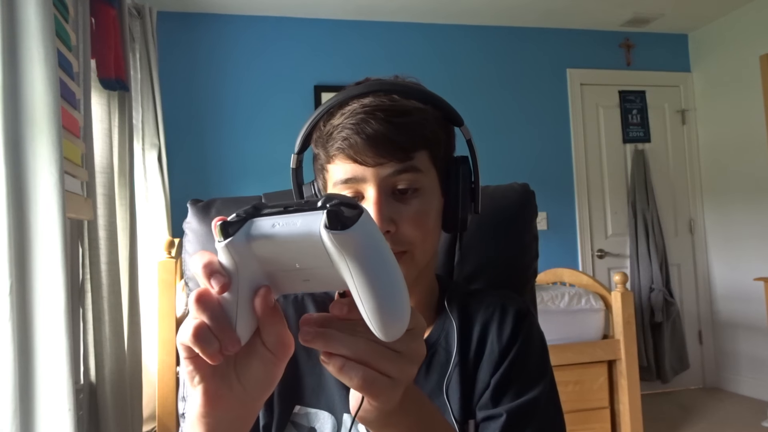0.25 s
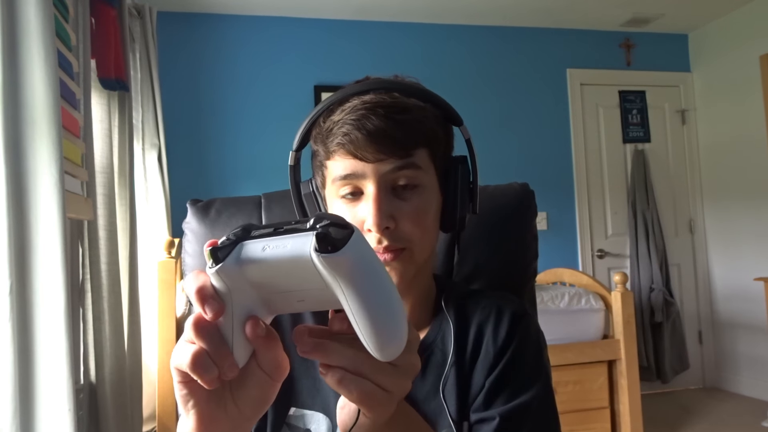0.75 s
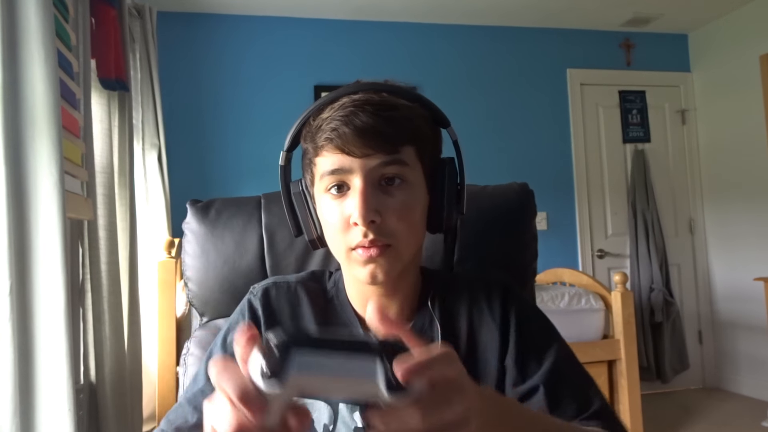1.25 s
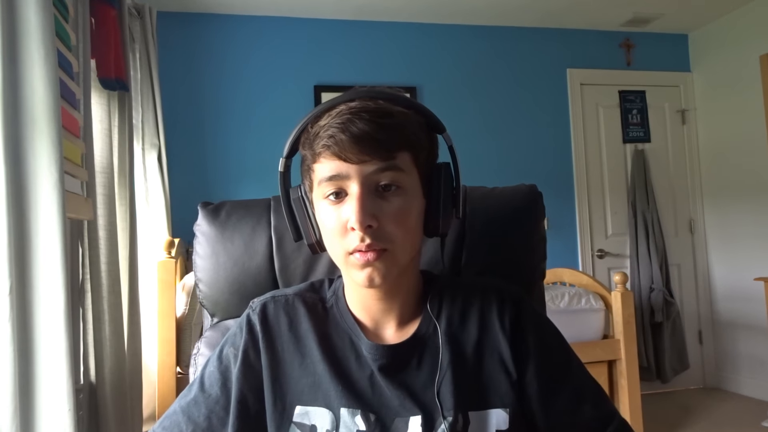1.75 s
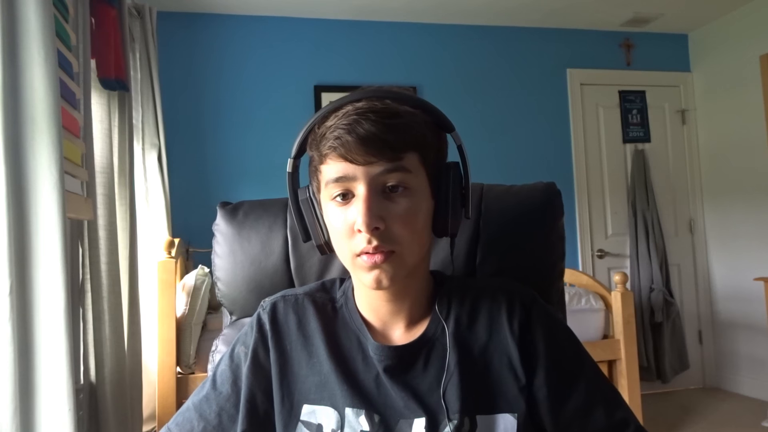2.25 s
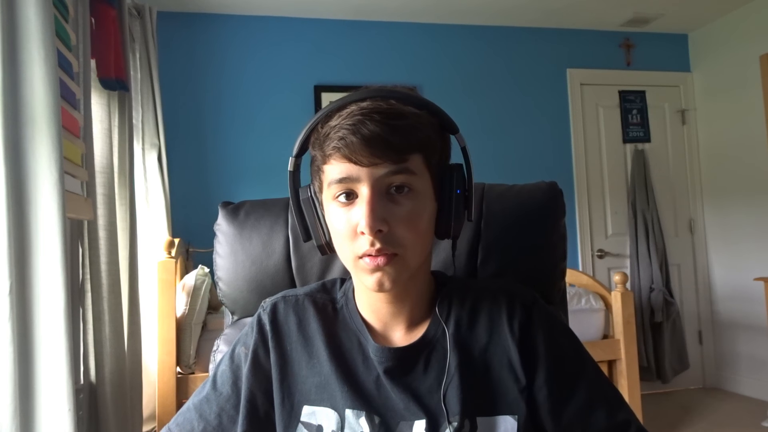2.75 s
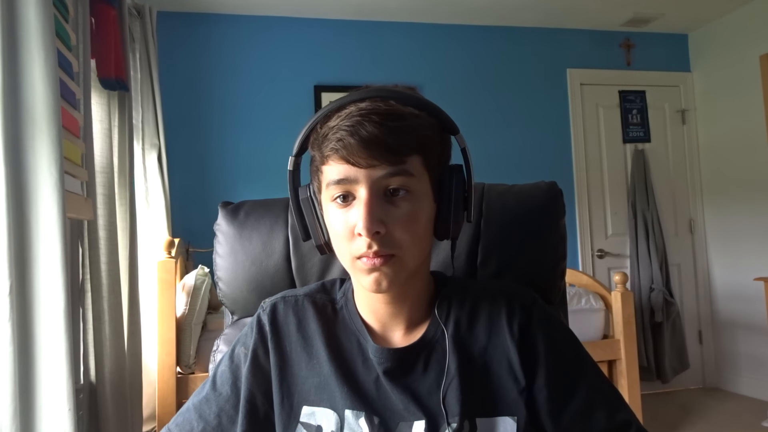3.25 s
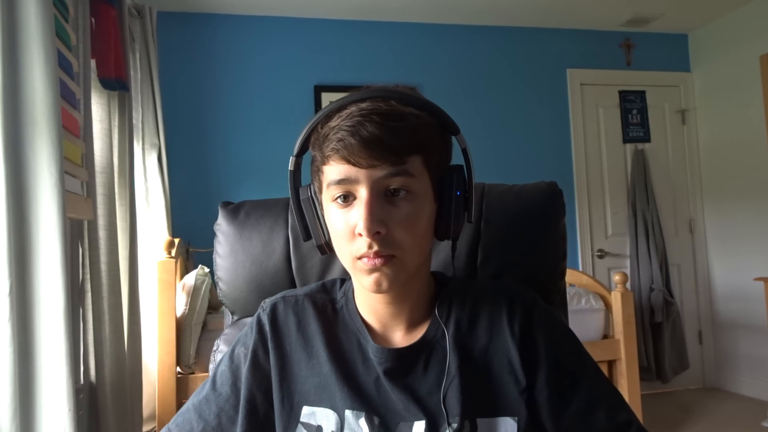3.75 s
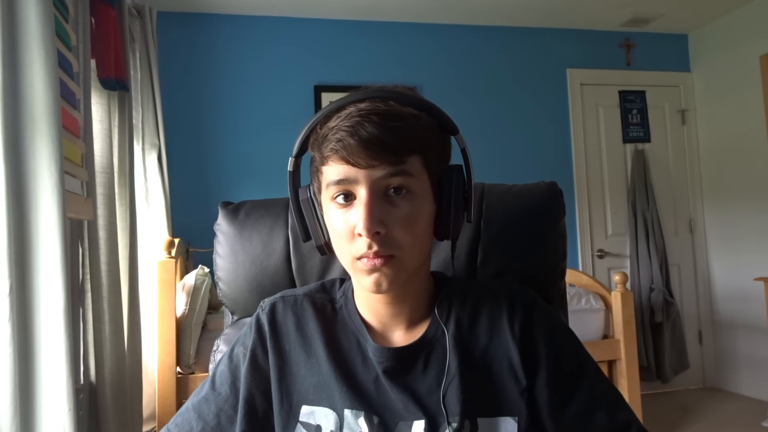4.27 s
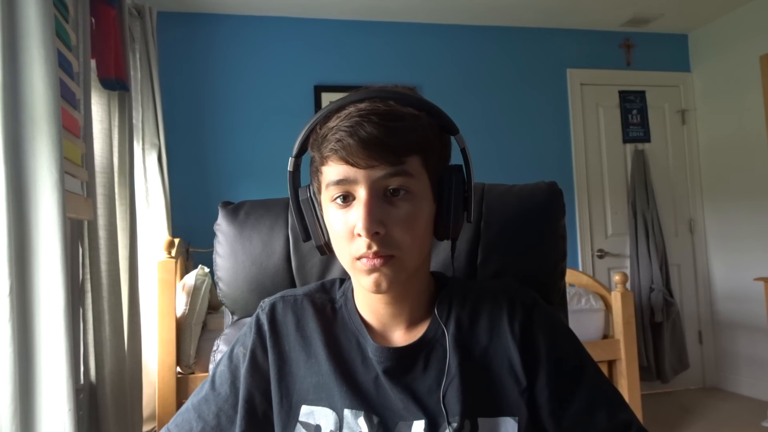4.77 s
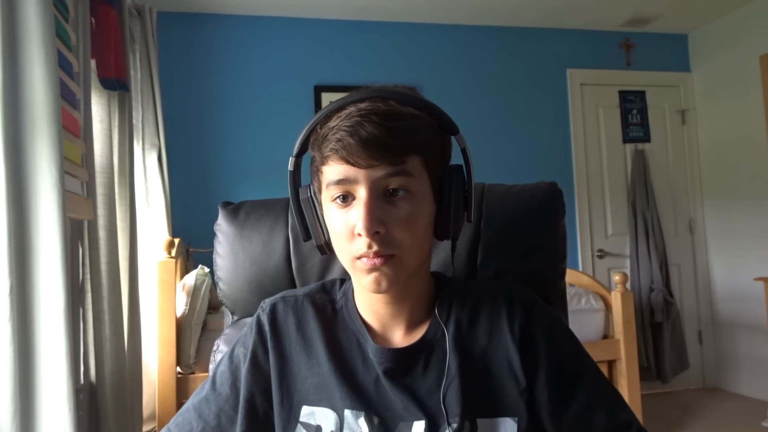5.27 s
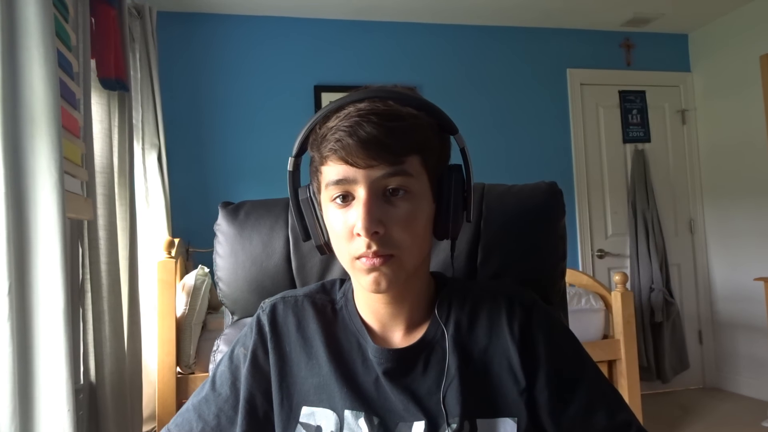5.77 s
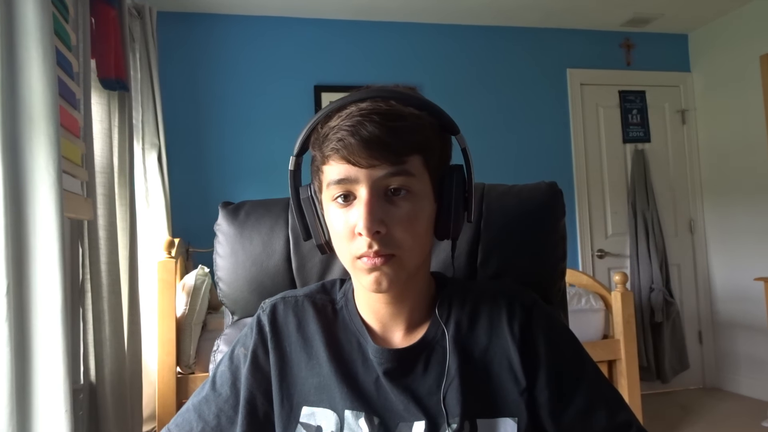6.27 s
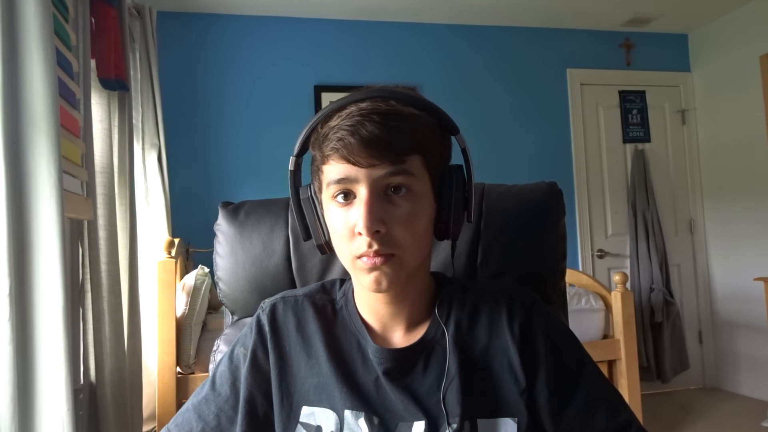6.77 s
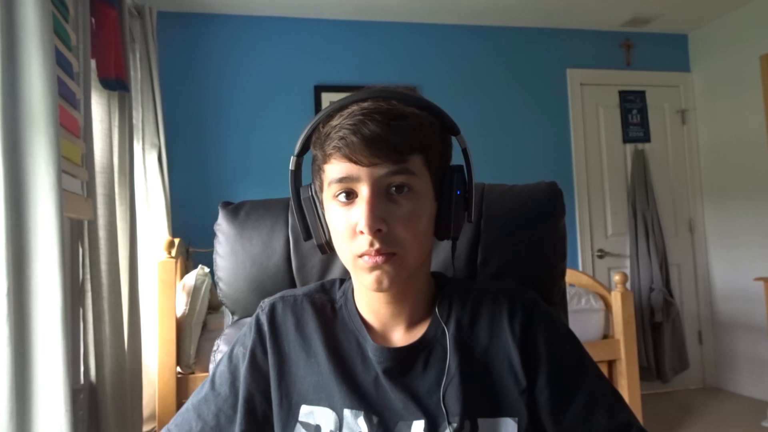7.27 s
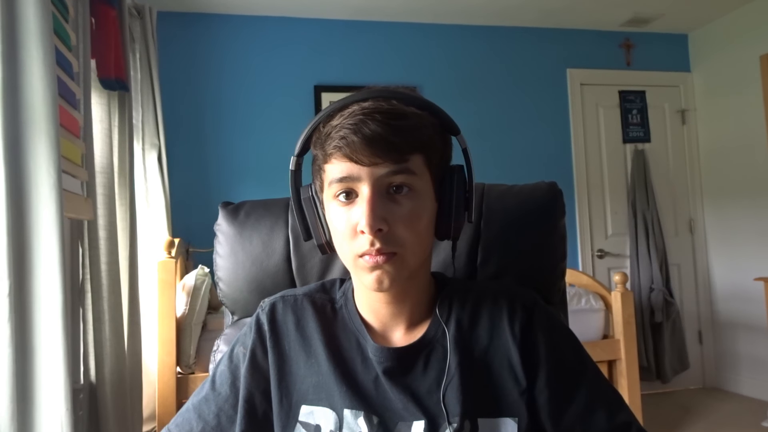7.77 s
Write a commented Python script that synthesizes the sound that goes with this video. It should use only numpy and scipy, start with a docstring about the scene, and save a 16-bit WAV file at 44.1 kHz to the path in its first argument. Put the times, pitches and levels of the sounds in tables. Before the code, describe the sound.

Close handling of a hollow plastic game controller in a small bedroom: a quick cluster of clicks as a headset plug catches and snaps in, brief scrapes, sleeve rustle and another sharp clack. Then a thumb clicks a button about four times a second, slightly uneven, until the hands rest. Faint steady hiss with a slight whirr lies beneath, picked up by a nearby stereo microphone.

```python
"""A faint, steady hiss with whirring bands fills a small bedroom while sleeves rustle over a plastic controller.
A headset plug catches and snaps home, the casing clacks, and skin and cable scrape over it: all in two seconds.
Then a thumb presses a button about four times a second, with a few releases heard, until the hands come to rest.
Contacts are damped modes plus a crack of noise; rubbing and hiss are shaped noise.
Echoes from desk, screen and body and a decaying noise tail from the walls answer the controller."""
import sys
import numpy as np
from scipy import signal
from scipy.fft import rfft, irfft, next_fast_len
from scipy.io import wavfile
from scipy.ndimage import map_coordinates

SR = 44100
rng = np.random.default_rng(int(sys.argv[2]) if len(sys.argv) > 2 else 0)


def dump_mix(stems):
    """Bounce the given channels to the path in sys.argv[1] as a 16-bit WAV at rate SR."""
    frames = np.atleast_2d(stems).T  # one column per channel
    limited = np.clip(frames, -1, 1)  # hard clip at full scale
    pcm = np.round(limited * 32767).astype(np.int16)
    wavfile.write(sys.argv[1], SR, pcm)


N = 353726

# Spectrum of the hiss. Each row: frequency in Hz, relative density in dB per Hz.
HISS_SPECTRUM = [(30, -27), (170, -16), (340, -11), (430, -7), (540, -2), (800, 0), (1000, -1.5),
                 (2000, -.5), (3500, -4.5), (5000, -6.5), (7000, -9), (11000, -13)]
# Narrow bands that stand out of the hiss. Each row: centre in Hz, half-width in Hz, level in dB.
WHIRR_BANDS = [(650, 40, -79.5), (4320, 65, -81), (4590, 70, -81.5)]
# Stereo likeness of the hiss. Each row: frequency in Hz, left-right correlation.
HISS_LIKENESS = [(60, 0.51), (220, 0.27), (830, 0.58), (3070, 0.036), (11400, 0.03)]

# Arm movements that rustle the sleeves. Each row: time of full swell in seconds, hold in seconds,
# level in dB before the friction lift.
ARM_MOVES = [(0.45, 0.043, -68.5), (0.845, 0.029, -63.5), (1.285, 0.027, -59), (1.44, 0.022, -57.5),
             (1.527, 0.14, -58.5)]
# Short slides of skin and cable over the casing. Each row: start in seconds, length in seconds,
# scrape level in dB and hollow shell level in dB, both before the friction lift.
SLIDES = [(0.606, 0.028, -38, -62.5), (0.989, 0.014, -60.5, -61.5), (1.215, 0.021, -42, -61.5),
          (1.286, 0.03, -53, -88), (1.413, 0.035, -58, -61), (1.65, 0.013, -60, -59)]
# Spectrum of cloth rubbing. Each row: frequency in Hz, relative density in dB per Hz.
CLOTH_SPECTRUM = [(120, -65), (200, -32.5), (284, -26.5), (547, -17), (818, -5.5), (1180, -11.5),
                  (1800, -2.5), (2520, -6.5), (3020, -3.5), (6760, -11.5), (11000, -18), (14300, -45.5),
                  (22000, -120)]
# Spectrum of a slide over textured plastic. Each row: frequency in Hz, relative density in dB per Hz.
SCRAPE_SPECTRUM = [(100, -57), (500, -40), (900, -19), (1700, -2.5), (2900, 2), (4300, -2.5), (6000, -7),
                   (11000, -16.5)]

# Stereo likeness of the direct sound. Each row: frequency in Hz, left-right correlation.
DIRECT_LIKENESS = [(1000, 0.86), (2500, 0.88), (4500, 0.61), (10000, 0.12)]
# Desk, screen and body reflections. Each row: left delay in seconds, right delay in seconds,
# left level in dB, right level in dB; delays sway a little and each source trims the levels.
ECHOES = [(.00228, .00221, -14.5, -14), (.00440, .00446, -11, -19), (.00755, 0.0094, -6, -6),
          (.00925, .00932, -10.5, -13), (0.016, .0181, -20, -13.5), (0.0245, 0.02, -18.5, -12.5)]
# Dying speed of the room. Each row: frequency in Hz, time to fall 60 dB in seconds.
ROOM_T60 = [(300, 0.61), (1000, 0.39), (2000, 0.29), (4000, 0.3), (10000, 0.28)]
# Tone of the room. Each row: frequency in Hz, relative gain in dB.
ROOM_GAIN = [(300, -10), (700, -7.5), (1050, -3), (1500, -5.5), (2000, -10.5), (3000, -10.5), (4500, -3),
             (10000, -5.5)]
# Stereo likeness of the room. Each row: frequency in Hz, left-right correlation.
ROOM_LIKENESS = [(500, 0.98), (1000, 0.59), (2000, 0.78), (4000, 0.19), (10000, 0)]

# Plug and casing contacts. Each row: start in seconds, level in dB before the trim,
# hollow knock in dB, hard edge in dB, treble snap in dB.
CONTACTS = [(0.2335, -34.5, 5.5, -1.5, -6), (0.245, -40.5, 7, -5, -17), (0.257, -32, 1.5, -15, -19),
            (0.2605, -33.5, 6, -8, -12), (0.2718, -28, 1, -3, -6.5), (0.2775, -29.5, -4, 11, 1.5),
            (0.2925, -29.5, -5, 3, -11.5), (0.5845, -23, 0, -8.5, 2), (0.932, -54, 8, -6, -17),
            (1.022, -47, 15, -5, -9), (1.0461, -45, -7, -5, -10.5), (1.5777, -21, -1.5, 1.5, -7.5)]
# Modes of the plug and its socket, before random variation. Each row: frequency in Hz,
# relative level in dB, time to fall 60 dB in seconds.
SOCKET_MODES = [(896, -15.5, 0.04), (1064, -24, 0.11), (1553, -11.5, 0.035), (1953, 3.5, 0.031),
                (2300, -10.5, .018), (2710, -3, 0.0067), (2920, 6, 0.022), (3535, -8, 0.0087),
                (4216, -2, 0.021), (5300, -5.5, 0.0085)]
# The crack of plastic on plastic. Each row: frequency in Hz, relative density in dB per Hz.
CRACK_SPECTRUM = [(30, -36), (300, -37), (550, -30), (850, -13), (1300, -15), (1900, -1), (3300, 0),
                  (5000, -7), (6500, -10), (8000, -14), (11000, -22)]

# Button presses. Each row: start in seconds, level in dB before the trim,
# sharpness in dB (a flick of the thumb is above 0, a gentle push below).
PRESSES = [(1.9735, -28.5, 6), (2.3412, -29.5, -2.5), (2.654, -28.5, 3), (2.9184, -29.5, 6),
           (3.1861, -27, 2), (3.4221, -30, -5.5), (3.5977, -45.5, -15), (3.703, -29, 2),
           (3.9084, -35.5, -6), (4.167, -34, -7.5), (4.4259, -33, -1.5), (4.7048, -29.5, 5.5),
           (4.9711, -29.5, 5), (5.227, -31.5, 3), (5.467, -33, 0.5), (5.7082, -30.5, -4),
           (5.9525, -30, -5.5), (6.1921, -29, -3.5), (6.3921, -31, 2), (6.6965, -33, 5),
           (7.1321, -30.5, 3.5)]
# The few heard releases, a button sliding back up, and one light tap at 2.794 s with the same hollow touch.
# Each row: start in seconds, level in dB before the trim.
RELEASES = [(2.056, -44.5), (2.431, -45), (2.794, -58), (6.524, -52), (6.823, -53.5), (7.029, -63),
            (7.238, -53.5)]
# Modes of the gripped shell under a button, before random variation. Each row: frequency in Hz,
# relative level in dB, time to fall 60 dB in seconds.
SHELL_MODES = [(906, -24, 0.032), (1096, -23, 0.039), (1873, -2.5, 0.019), (2023, 1.5, 0.019),
               (2435, -8.5, 0.025), (2932, -1, 0.0091), (3327, 4.5, 0.0071), (4048, 1.5, 0.0072),
               (4550, -16, 0.032), (6285, -4.5, 0.0075)]
# Touch of a press of sharpness 0. In order: hollow knock in dB, hard edge in dB, treble snap in dB.
PRESS_TOUCH = (1, 0.83, -10)
# Touch of a release. In order: hollow knock in dB, hard edge in dB, treble snap in dB.
RELEASE_TOUCH = (15, 0, -4.5)
# A sharper press is brighter. In order: dB of knock, of edge and of snap gained per dB of sharpness.
BRIGHTENS = (0.36, 0.69, 1.0)

TOP_HZ = 11150  # band limit
HIT, TAIL = 2048, 14400  # lengths of a click and of the room's answer (samples)
SWELL_S, SETTLE_DB_PER_S = 0.15, 66  # a rustle swells up to its time and dies away after its hold
FIDGET_DB, STILL_S = -73.5, 7.8  # faint stirring before the friction lift, until the hands come to rest
CHATTER_S, CHATTER_DULL_DB = .0045, 9.5  # mean wait for the second landing, and its loss of treble


def amp(db):
    """Decibels to gain."""
    return 10 ** (np.asarray(db) / 20)


def unit(x):
    """Scale to rms 1."""
    return x / np.sqrt(np.mean(x ** 2) + 1e-20)


def along(points, hz):
    """Read (Hz, value) points on a log frequency axis."""
    f, v = np.transpose(points)
    return np.interp(np.log(hz + 1), np.log(f + 1), v)


def filtered(x, response):
    """Shape a sound's spectrum by a response of frequency."""
    n = x.shape[-1]
    m = next_fast_len(n + HIT)
    spectrum = rfft(x, m) * response(np.fft.rfftfreq(m, 1 / SR))
    return irfft(spectrum, m)[..., :n]


def coloured(x, points):
    """EQ a short sound to (Hz, dB) points with a minimum-phase filter, so nothing smears ahead of the hit."""
    gain = amp(along(points, np.fft.rfftfreq(2 * HIT, 1 / SR)))
    # folding the cepstrum forward in time makes the filter causal
    cepstrum = irfft(np.log(gain))
    cepstrum[1:HIT] *= 2
    cepstrum[HIT + 1:] = 0
    return irfft(rfft(x, 2 * HIT) * np.exp(rfft(cepstrum)))[..., :HIT]


def noise_pair(likeness, size):
    """White stereo noise, its mid and side balanced to give the wanted left-right correlation."""
    def mid_side_gain(hz):
        turn = np.arccos(np.clip(along(likeness, hz), -1, 1)) / 2
        return np.array([np.cos(turn), np.sin(turn)])

    mid, side = filtered(rng.standard_normal((2, size)), mid_side_gain)
    return np.array([mid + side, mid - side])


def add(track, s, sound):
    """Mix a sound into the track at time s."""
    start = max(round(s * SR), 0)
    part = sound[:, :track.shape[1] - start]
    track[:, start:start + part.shape[1]] += part


def room_tone(hiss_db=-67):
    """Steady shaped noise with a few faint resonant bands whirring in it."""
    hiss = unit(filtered(noise_pair(HISS_LIKENESS, size=N), lambda hz: amp(along(HISS_SPECTRUM, hz))))
    tone = amp(hiss_db) * hiss
    for centre, width, db in WHIRR_BANDS:
        band = lambda hz: 1 / (1 + ((hz - centre) / width) ** 2)
        tone = tone + amp(db) * unit(filtered(noise_pair(HISS_LIKENESS, size=N), band))
    return tone


def handling(walls, hollow_hz=840, width_hz=60, lift_db=3.0):
    """Grainy friction of sleeves and skin; quick slides scrape the casing and stir its lowest resonance."""
    t = np.arange(N) / SR
    scrape, stir = np.zeros(N), np.zeros(N)
    for s, length, scrape_db, hollow_db in SLIDES:
        stroke = np.interp(t, [s - .001, s + 0.00084, s + length, s + length + 0.0056], [0, 1, 1, 0])
        scrape += amp(scrape_db) * stroke
        stir += amp(hollow_db) * stroke
    # fibres catch and let go, in clumps
    grip = amp(3.4 * wobble(400) + 1.1 * wobble(35))

    def rub(spectrum):
        grains = noise_pair(DIRECT_LIKENESS, size=N) * grip
        return unit(filtered(grains, lambda hz: amp(along(spectrum, hz))))

    resonance = lambda hz: 1 / (1 + ((hz - hollow_hz) / width_hz) ** 2)
    hollow = unit(filtered(rng.standard_normal(N), resonance))
    rubbing = sleeve_level() * rub(CLOTH_SPECTRUM) + scrape * rub(SCRAPE_SPECTRUM)
    friction = amp(lift_db) * (rubbing + stir * hollow)
    near = near_field(friction, echo_db=-3.5)[:, :N]
    return near + signal.fftconvolve(friction, walls, axes=1)[:, :N]


def sleeve_level():
    """Each arm movement swells, holds and settles; the loudest wins over the faint stirring of the hands."""
    t = np.arange(N) / SR
    settle = lambda end: amp(-SETTLE_DB_PER_S * np.maximum(t - end, 0))
    levels = [amp(FIDGET_DB) * settle(STILL_S)]
    for s, length, db in ARM_MOVES:
        swell = np.clip(1 + (t - s) / SWELL_S, 0, 1)
        levels.append(amp(db) * swell * settle(s + length))
    return np.max(levels, axis=0)


def wobble(rate):
    """A random curve of straight lines between rate knots a second."""
    return map_coordinates(rng.standard_normal(N // 20), [np.arange(N) * rate / SR], order=1)


def near_field(sound, echo_db):
    """A sound together with its early echoes from the desk, the screen and the body."""
    paths = np.zeros((2, TAIL))
    paths[:, 0] = 1  # direct sound
    for left_s, right_s, left_db, right_db in ECHOES:
        sway = rng.normal(0, .00006)  # seconds
        paths[0, round(abs(left_s + sway) * SR)] += amp(left_db + echo_db)
        paths[1, round(abs(right_s + sway) * SR)] += amp(right_db + echo_db)
    return signal.fftconvolve(sound, paths, axes=1)


def room_tail():
    """The diffuse answer of the bedroom: noise in which each frequency dies at its own speed."""
    hz, t, z = signal.stft(noise_pair(ROOM_LIKENESS, size=TAIL), SR, nperseg=256)
    decay = amp(-60 * t / along(ROOM_T60, hz)[:, None])
    tail = signal.istft(z * decay, SR, nperseg=256)[1]
    build_up = np.clip(np.arange(tail.shape[1]) / SR / 0.015, 0, 1) ** 2  # reflections gather over 15 ms
    tail = filtered(tail * build_up, lambda f: f < TOP_HZ)
    level = np.linalg.norm(tail[0]) * np.sqrt(2)
    return filtered(tail / level, lambda f: amp(along(ROOM_GAIN, f)))


def plug(walls, level_db=-7):
    """The plug catches and snaps home; the casing clacks as the grip changes."""
    track = np.zeros((2, N))
    for s, db, *touch in CONTACTS:
        clack = lambda: click(SOCKET_MODES, *touch, crack_db=4.0, crack_t60=0.025, attack=0.00026)
        add(track, s, amp(db + level_db) * reflected(clack, walls, echo_db=-6, room_db=3.0))
    return track


def click(modes, knock_db, edge_db, snap_db, crack_db, crack_t60, attack, vary_db=4.0):
    """One contact: damped modes and a brief crack, coloured by how hard and where it lands."""
    t = np.arange(HIT) / SR
    hz, db, t60 = np.transpose(modes)[:, :, None]
    strength, detune = rng.standard_normal((2, len(modes), 1))
    # neighbouring modes swing in opposite directions; short waves reach the two microphones out of step
    opposed = np.pi * np.arange(len(modes))[:, None]
    phase = opposed + rng.standard_normal((2, len(modes), 1)) * (hz / 6000) ** 2
    decay = amp(db + vary_db * strength - 60 * t / t60)
    swing = np.sin(2 * np.pi * hz * (1 + 0.01 * detune) * t + phase)
    ring = np.sum(decay * swing, axis=1)
    ring = unit(ring * (1 - np.exp(-t / attack)))
    burst = noise_pair(DIRECT_LIKENESS, size=HIT) * amp(-60 * t / crack_t60)
    crack = unit(coloured(burst, CRACK_SPECTRUM))
    # so small a shell radiates little bass
    bass = [(60, -10.0), (400, knock_db / 2 - 6.5), (850, knock_db), (1100, knock_db)]
    middle = [(1700, 0.008), (2300, 0)]
    treble = [(3000, edge_db), (4300, (edge_db + snap_db) / 2), (6200, snap_db)]
    return coloured(unit(ring + amp(crack_db) * crack), bass + middle + treble)


def reflected(radiate, walls, echo_db, room_db):
    """The shell radiates a different click in each direction, so the room's sum is smoother than any one."""
    heard = near_field(radiate(), echo_db)
    for tail in (walls, room_tail(), room_tail()):
        add(heard, 0, amp(room_db) / np.sqrt(3) * signal.fftconvolve(radiate(), tail, axes=1))
    return heard


def buttons(walls, level_db=-7.0):
    """A thumb presses about four times a second; now and then the release is heard."""
    track = np.zeros((2, N))
    touches = []
    for s, db, sharpness in PRESSES:
        touches.append((s, db, np.add(PRESS_TOUCH, np.multiply(BRIGHTENS, sharpness))))
    for s, db in RELEASES:
        touches.append((s, db, RELEASE_TOUCH))
    for s, db, touch in touches:
        sound = reflected(lambda: press(*touch), walls, echo_db=-0.5, room_db=1.5)
        add(track, s, amp(db + level_db) * sound)
    return track


def press(knock_db, edge_db, snap_db, rebound_db=-9.5):
    """The button lands and chatters once, more so after a hard-edged touch."""
    drag = amp(0.61 * max(knock_db, 0))  # a hollower touch, as of a release, scrapes for longer
    hit = click(SHELL_MODES, knock_db, edge_db, snap_db,
                crack_db=0, crack_t60=0.016 * drag, attack=0.0013)
    rebound = click(SHELL_MODES, knock_db, edge_db, snap_db - CHATTER_DULL_DB,
                    crack_db=2, crack_t60=0.011 * drag, attack=0.00044)
    add(hit, rng.normal(CHATTER_S, .0004), amp(rebound_db + edge_db / 2) * rebound)
    return hit


def scene():
    """The controller sits a little to the left, in one room, over the hiss."""
    tone = room_tone()
    walls = room_tail()
    controller = handling(walls) + plug(walls) + buttons(walls)
    return tone + controller * amp([[.4], [-.4]])  # left and right in dB


def record(dry):
    """The microphone channel keeps nothing above its band limit, with a 200 Hz wide slope around it."""
    return filtered(dry, lambda hz: np.clip((TOP_HZ - hz) / 200 + .5, 0, 1))


dry = scene()
out = record(dry)
dump_mix(out)
```